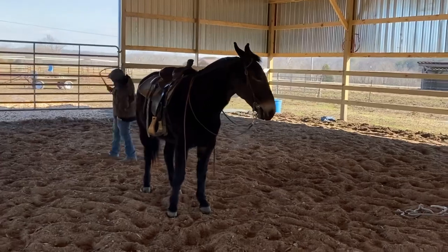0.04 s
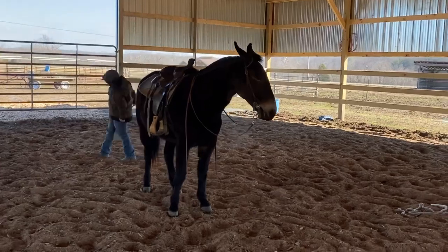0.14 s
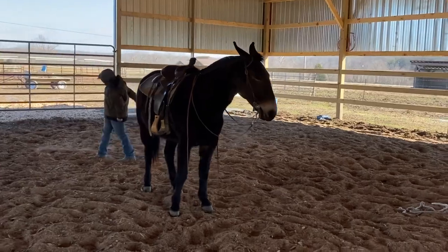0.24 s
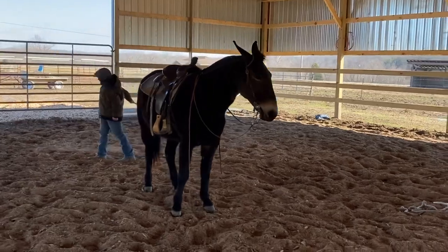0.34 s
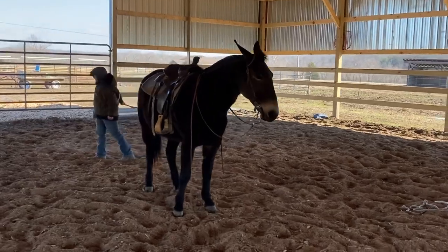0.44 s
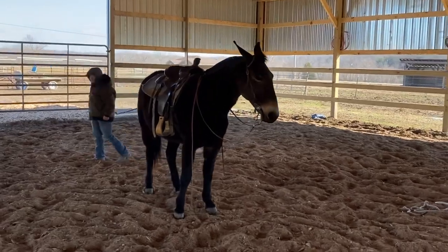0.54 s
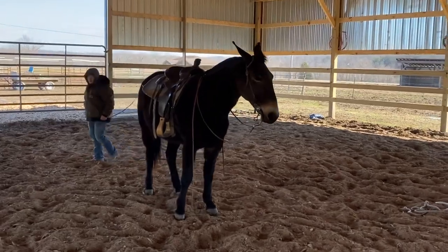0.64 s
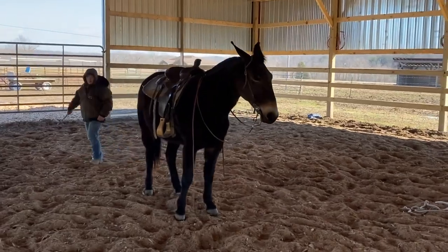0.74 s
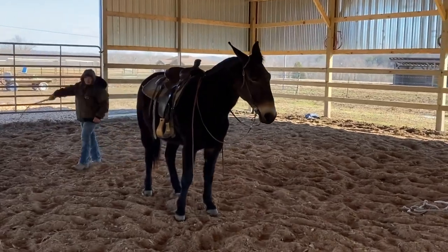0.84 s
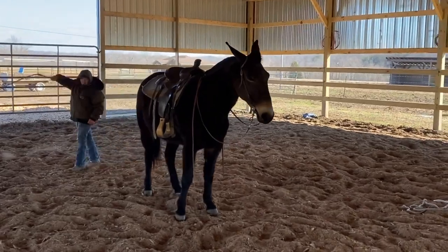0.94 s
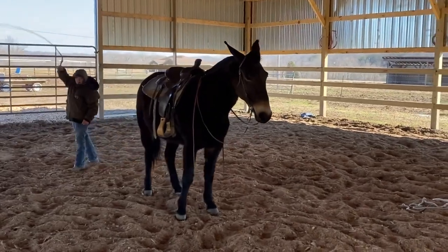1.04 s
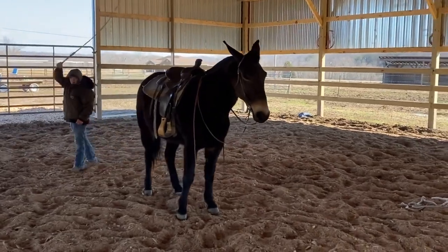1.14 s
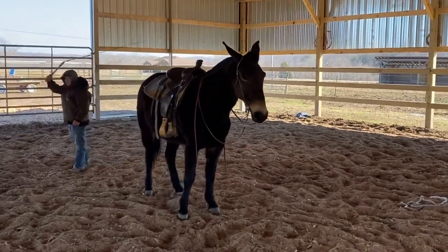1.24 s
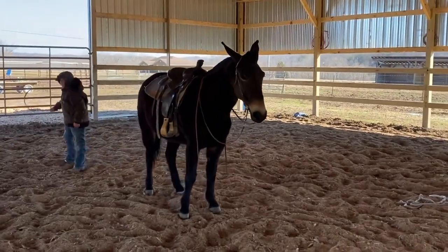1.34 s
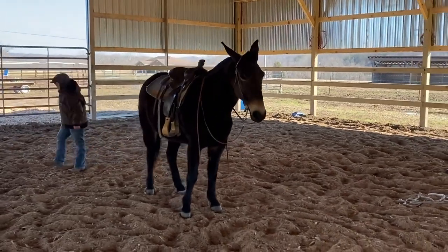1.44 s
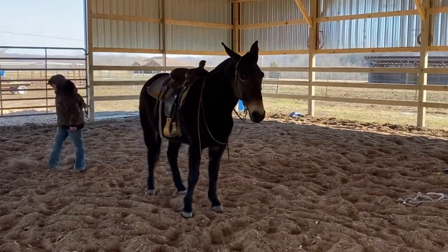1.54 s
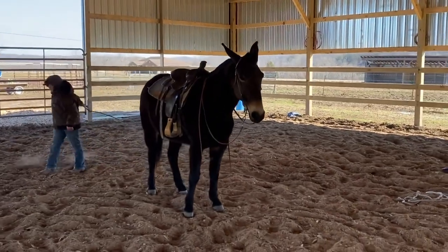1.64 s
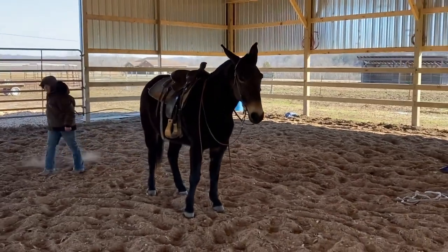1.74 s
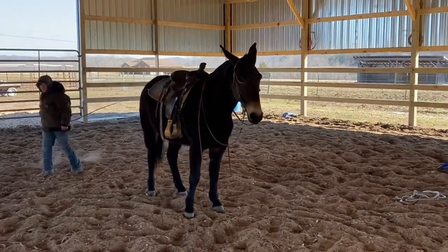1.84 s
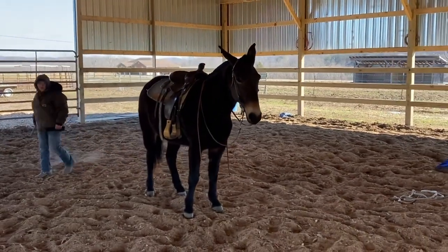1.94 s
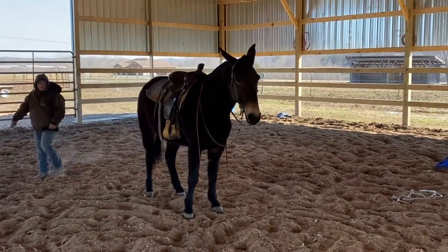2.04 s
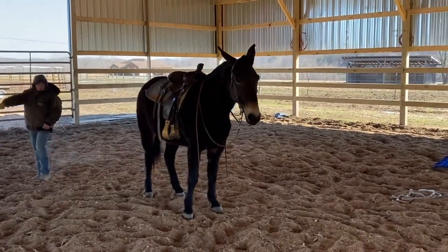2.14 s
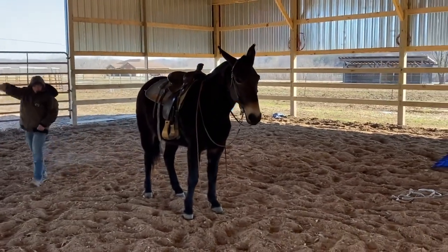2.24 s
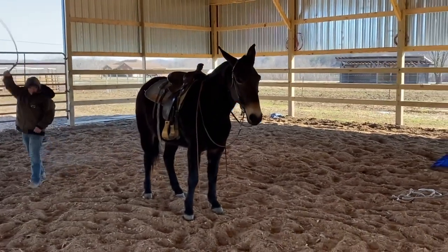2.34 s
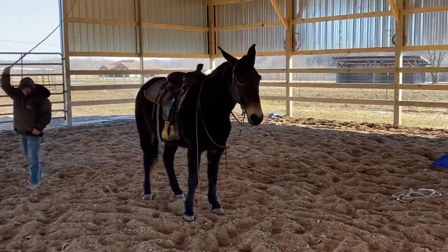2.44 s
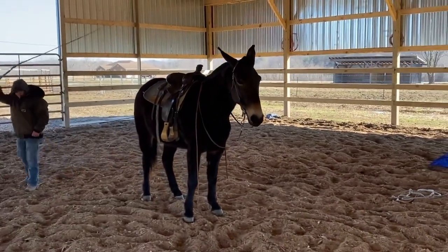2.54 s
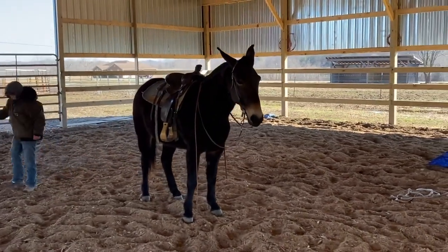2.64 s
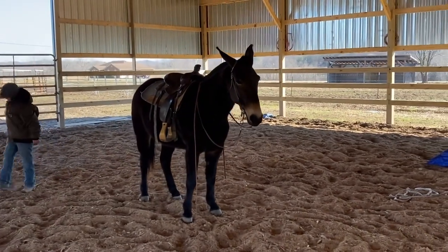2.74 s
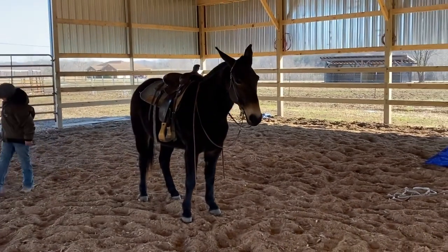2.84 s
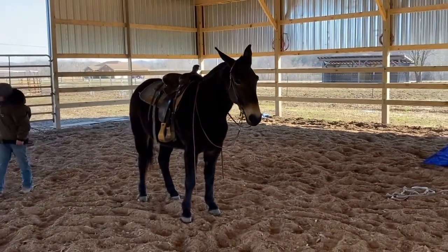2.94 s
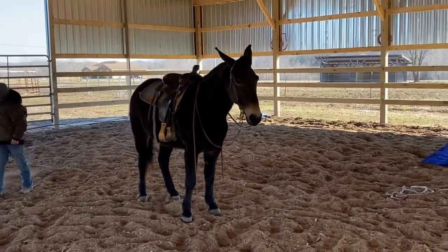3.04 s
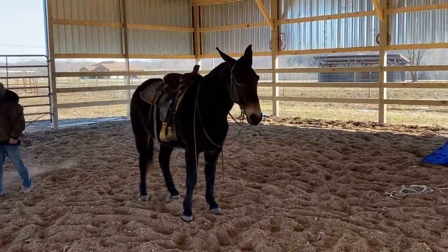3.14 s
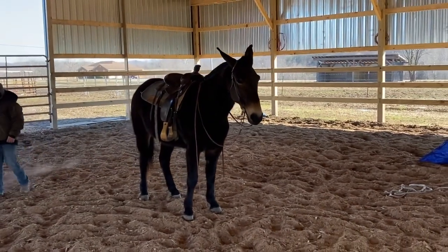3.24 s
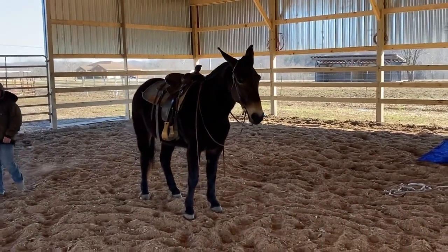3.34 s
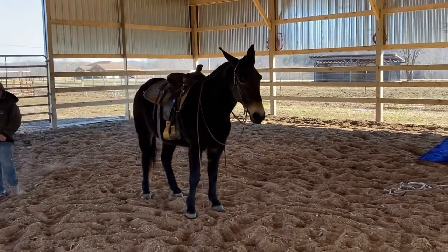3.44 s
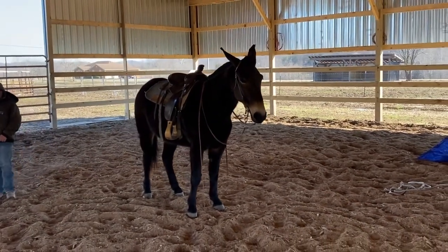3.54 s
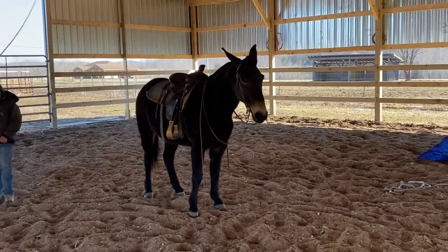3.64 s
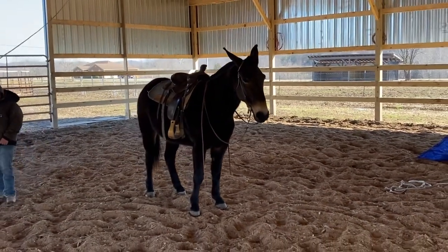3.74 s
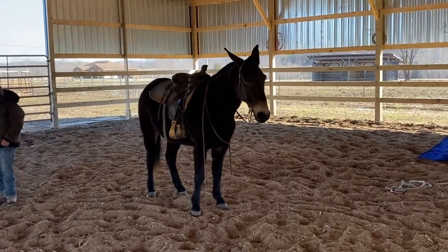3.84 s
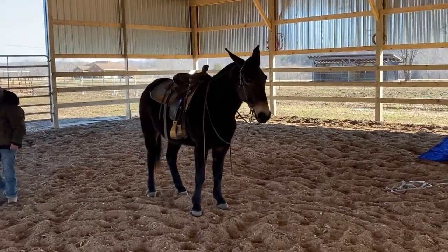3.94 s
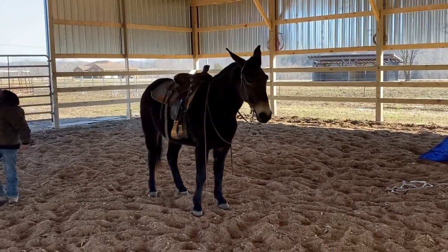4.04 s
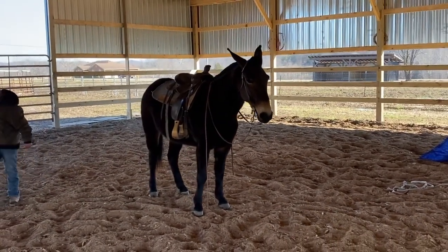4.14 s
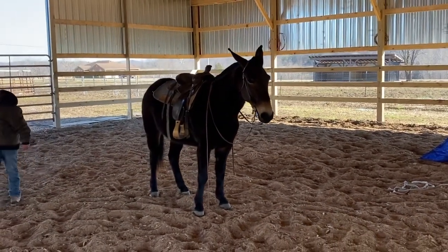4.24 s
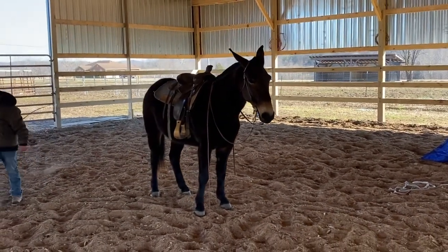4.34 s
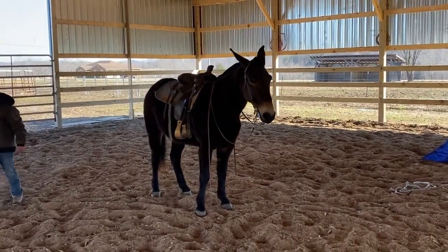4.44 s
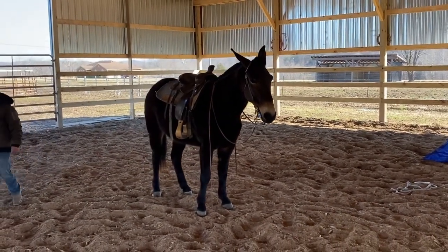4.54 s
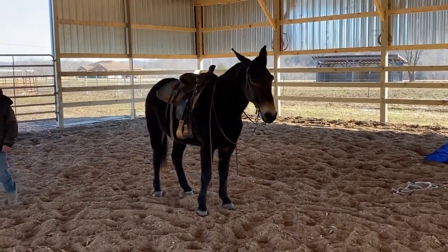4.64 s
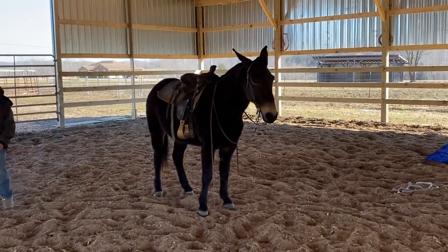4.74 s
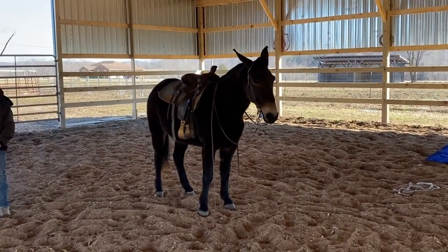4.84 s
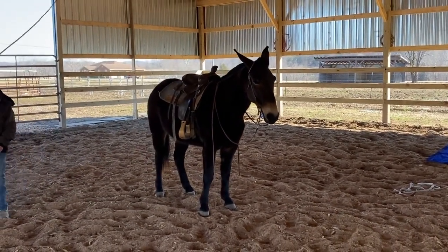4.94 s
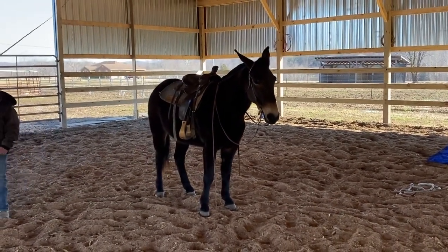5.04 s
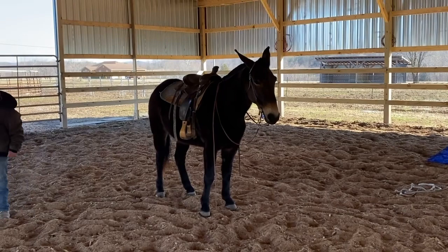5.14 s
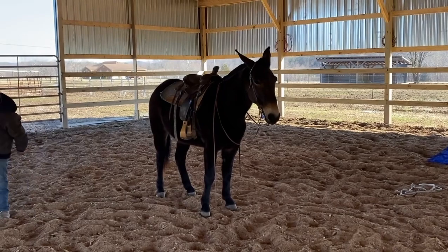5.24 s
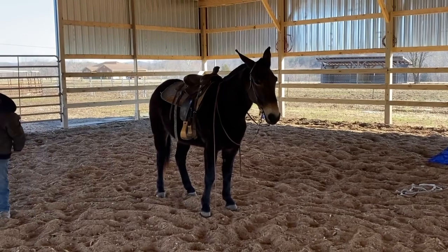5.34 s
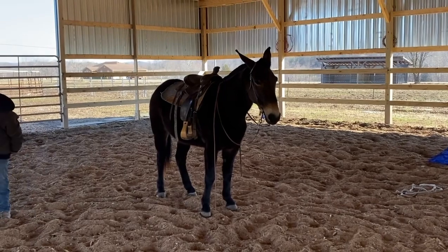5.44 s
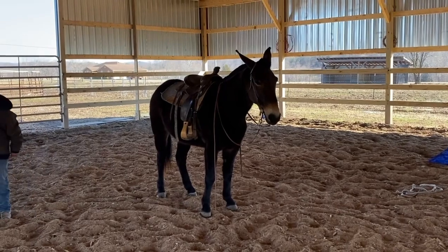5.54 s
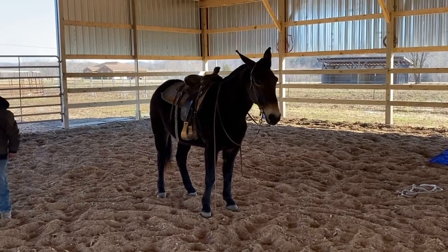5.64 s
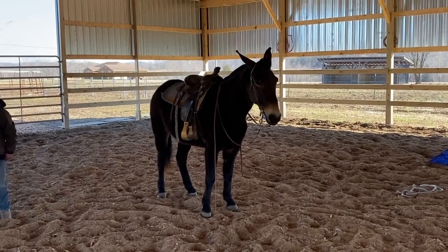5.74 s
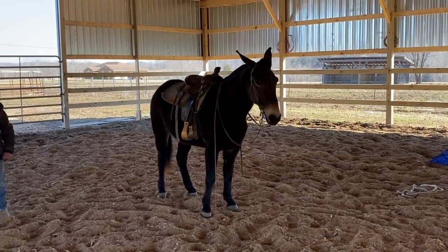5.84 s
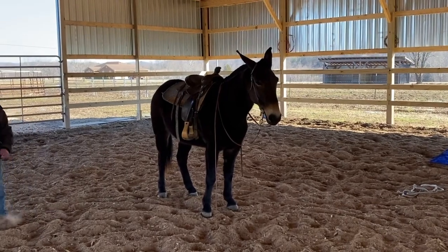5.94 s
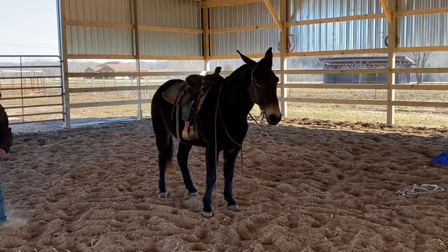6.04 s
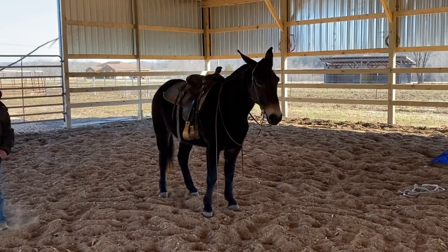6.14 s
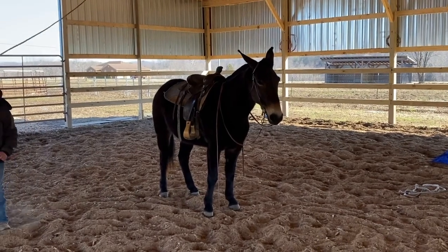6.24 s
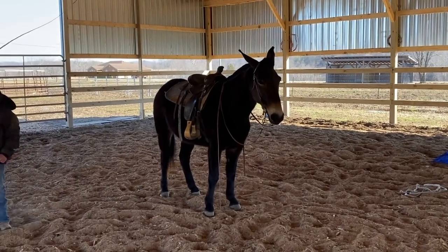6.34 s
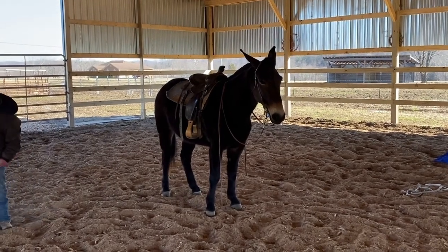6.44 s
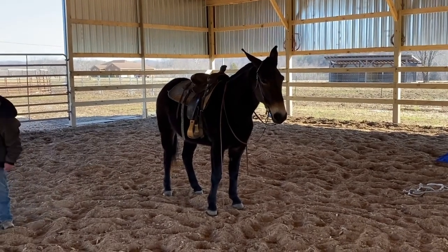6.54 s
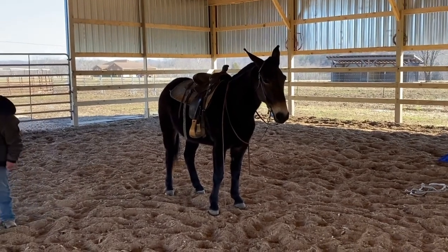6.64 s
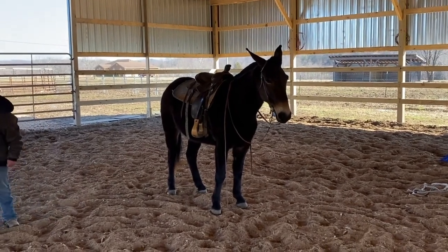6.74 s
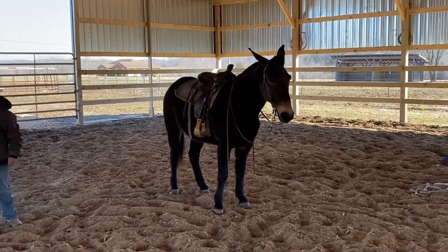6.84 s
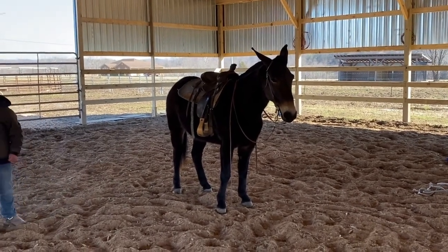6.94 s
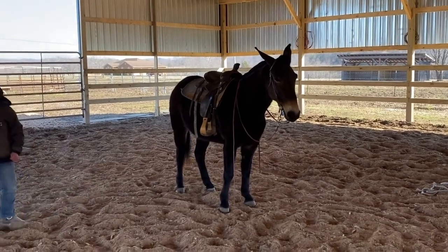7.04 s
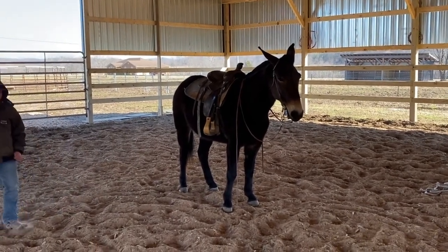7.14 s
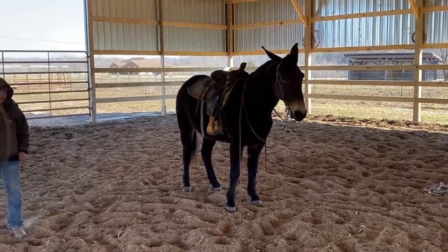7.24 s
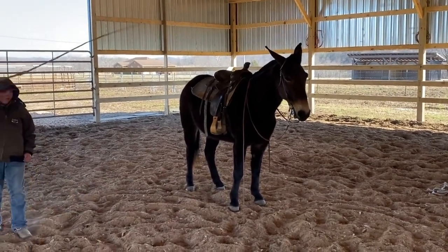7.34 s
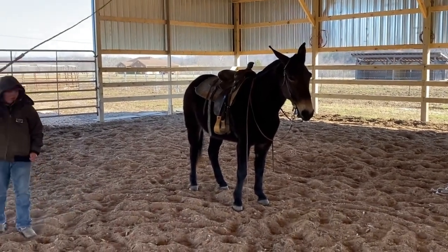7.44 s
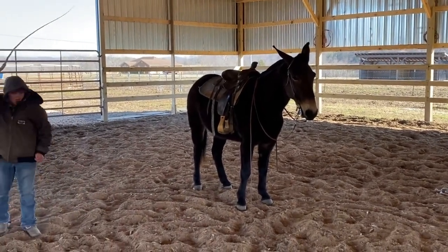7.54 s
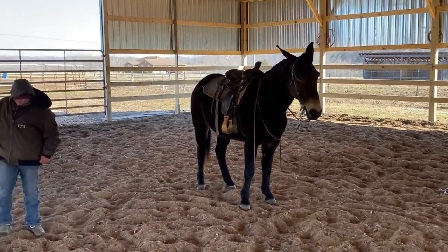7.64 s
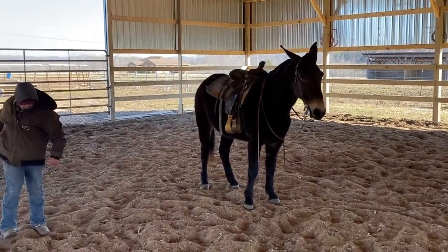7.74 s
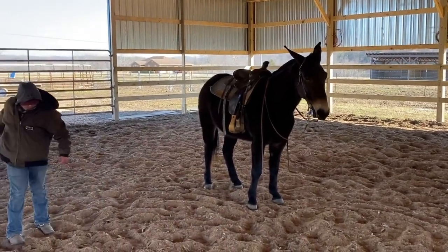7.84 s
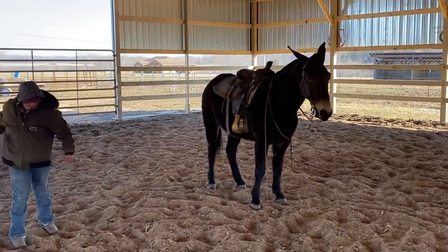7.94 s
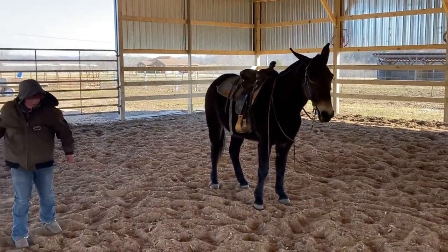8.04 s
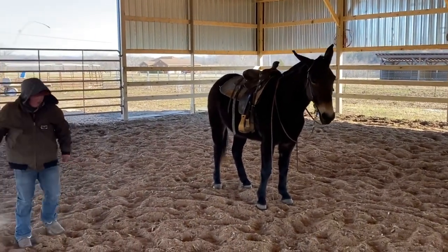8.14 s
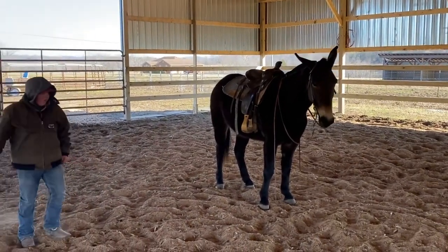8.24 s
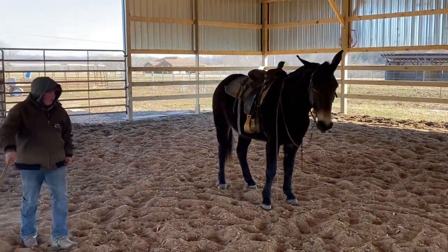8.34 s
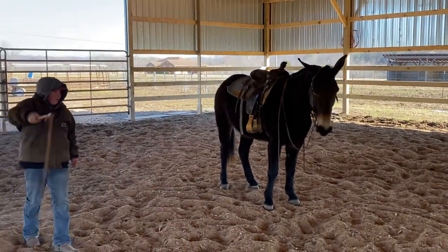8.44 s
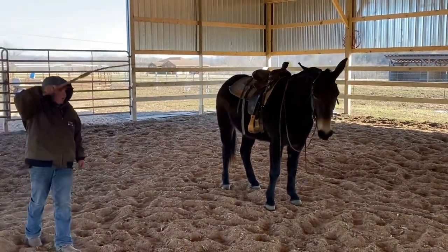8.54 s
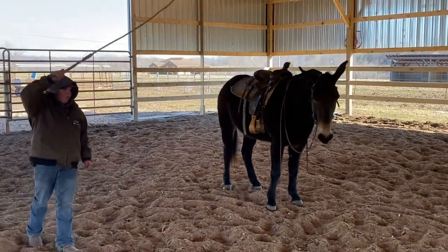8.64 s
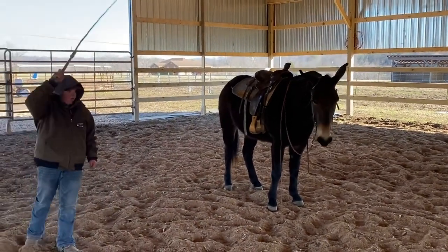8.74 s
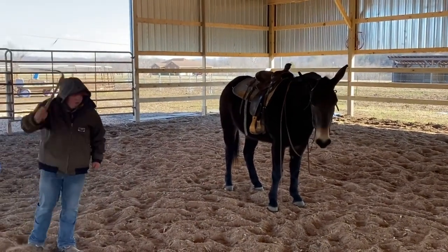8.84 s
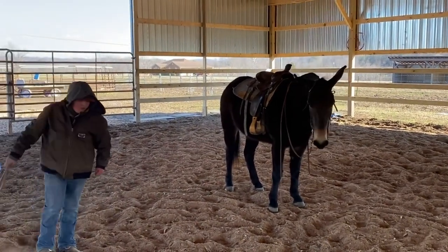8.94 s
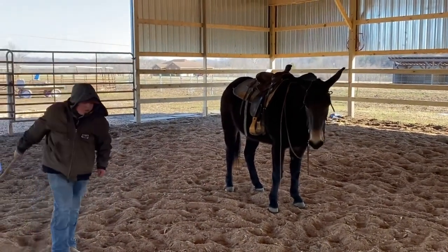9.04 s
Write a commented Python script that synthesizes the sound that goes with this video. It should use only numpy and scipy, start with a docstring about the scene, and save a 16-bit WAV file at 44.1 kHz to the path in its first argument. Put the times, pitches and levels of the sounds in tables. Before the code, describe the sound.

Eight sharp whip cracks ring under a metal arena roof, with soft swishes and slaps of the lash on sand between them.

```python
"""A long training whip cracks eight times in a sand-floored riding arena with a sheet-metal roof.
Each stroke: the rod whooshes, the tip rushes up and snaps, a low thump sweeps down, roof and hall answer.
Between cracks the lash slaps the sand and swishes back, among dull thuds and a few faint peeps.
Two microphone ports pick it up; gain control ducks after every crack."""
import sys
import numpy as np
from scipy import signal
from scipy.fft import rfft, irfft, next_fast_len
from scipy.io import wavfile
from scipy.ndimage import uniform_filter1d, minimum_filter1d

SR = 44100
rng = np.random.default_rng(int(sys.argv[2]) if len(sys.argv) > 2 else 0)


def unload_audio(sound):
    """Save the sound as a 16-bit wav file, at the path given as the first command line argument."""
    columns = np.transpose(np.atleast_2d(sound))
    # keep every value between -1 and 1, then stretch to whole-number steps
    steps = np.round(np.clip(columns, -1, 1) * 32767)
    wavfile.write(sys.argv[1], SR, steps.astype(np.int16))


N = 401310
TIME_S = np.arange(N) / SR
EVENT_S = np.arange(int(1.1 * SR)) / SR


def from_db(db):
    """Level to amplitude."""
    return 10 ** (np.asarray(db) / 20)


def unit_rms(x):
    """Scale to rms 1."""
    return x / np.sqrt(np.mean(x ** 2) + 1e-20)


def at_hz(points, hz):
    """Table lookup on a log-frequency axis."""
    f, value = np.transpose(points)
    return np.interp(np.log(np.maximum(hz, 1)), np.log(f), value)


def add(out, s, sound):
    """Mix a sound in from time s."""
    start = max(round(s * SR), 0)
    out[:, start:start + sound.shape[-1]] += sound[..., :max(N - start, 0)]


def bell(t, sigma_s):
    """Gaussian envelope around t = 0."""
    return np.exp(-np.minimum((t / sigma_s) ** 2, 100) / 2)


def random_curve(x):
    """Straight lines between normal draws at whole x."""
    return np.interp(x, np.arange(512), rng.standard_normal(512))


# Diffuse sound at the two ports: f/Hz, coherence
PORT_COHERENCE = [(50, .92), (200, .87), (500, .62), (1000, .4), (1500, .55), (2500, .965), (4000, .985),
                  (16000, .95)]

def diffuse_noise(spectrum, size, ripple_db=0, ripple_hz=80):
    """Stereo noise from all sides, rms 1; interfering reflections ripple its spectrum."""
    hz = np.fft.rfftfreq(size, 1 / SR)
    mid, side = rfft(rng.standard_normal((2, size)))
    level_db = at_hz(spectrum, hz) + ripple_db * random_curve(hz / ripple_hz)
    coherence = np.clip(at_hz(PORT_COHERENCE, hz), 0, 1)
    ports = np.sqrt(1 + coherence) * mid + np.sqrt(1 - coherence) * side * [[1], [-1]]
    return unit_rms(irfft(ports * from_db(level_db), size))


def click(spectrum, size=2048):
    """Minimum-phase pulse with this spectrum, peak 1."""
    hz = np.fft.rfftfreq(size, 1 / SR)
    cepstrum = irfft(np.log(from_db(at_hz(spectrum, hz))))
    causal = 2 * cepstrum * (np.arange(size) < size // 2)
    pulse = irfft(np.exp(rfft(causal) - cepstrum[0]))
    return pulse / np.abs(pulse).max()


def scatter(spectrum, decay_s, grain_db, build_s, size=16384):
    """Dying cluster of small, uneven arrivals."""
    t = np.arange(size) / SR
    grains = from_db(grain_db * unit_rms(uniform_filter1d(rng.standard_normal(size), size=24)))
    envelope = np.exp(-t / decay_s) * (1 - np.exp(-t / build_s))
    return diffuse_noise(spectrum, size, ripple_db=3) * unit_rms(grains) * envelope


# Background spectrum: f/Hz, level/dB
AMBIENCE = [(20, -3), (70, 11), (150, 3.5), (400, 1.5), (700, -1.5), (1100, -10), (3000, -17),
            (4700, -14.5), (7000, -16.5), (16000, -20)]

def ambience():
    """Steady quiet of the open-sided arena."""
    return from_db(-68.5) * diffuse_noise(AMBIENCE, N)


# Rod whoosh spectrum: f/Hz, level/dB
ROD_WHOOSH = [(100, -13), (220, -5), (400, -2.5), (680, -3.5), (900, -12.5), (1500, -19.5), (3000, -29),
              (8000, -41.5)]
# Moved-air spectrum: f/Hz, level/dB
AIR_RUMBLE = [(20, -24), (45, -3), (70, -0.5), (110, -7.5), (170, -15.5), (300, -30), (1000, -54.5)]
# Rod return strokes: t/s, sigma/s, whoosh/dB, relative rumble/dB
ROD_BACKSWINGS = [(1.05, .12, -56, -54.5), (2.268, 0.16, -59.5, -62.5), (3.484, .17, -57.5, -47.5),
                  (4.779, 0.15, -63.5, -62), (6.064, 0.12, -61, -56.5), (7.181, 0.12, -60, -54.5),
                  (8.49, 0.085, -56.5, -64)]

def rod_swings(lead_s=0.082, forward_sigma_s=0.062, wake_fade_s=0.24, lump_db=4, lumps_per_s=14):
    """The rod whooshes forward and back, fastest just before each crack, and stirs a lumpy rumble."""
    whoosh, rumble = 0, from_db(-71.5)  # air at rest
    for s, whoosh_db, *_ in WHIP_CRACKS:
        swing = from_db(whoosh_db) * bell(TIME_S - s + lead_s, forward_sigma_s)
        wake = from_db(-53.5) * (TIME_S > s) * np.exp(-np.abs(TIME_S - s) / wake_fade_s)
        whoosh += swing
        rumble += from_db(-3.5) * swing + wake
    for s, sigma_s, whoosh_db, rumble_db in ROD_BACKSWINGS:
        swing = bell(TIME_S - s, sigma_s)
        whoosh += from_db(whoosh_db) * swing
        rumble += from_db(rumble_db - 4.5) * swing
    rumble *= from_db(lump_db * random_curve(TIME_S * lumps_per_s))
    return whoosh * diffuse_noise(ROD_WHOOSH, N) + rumble * diffuse_noise(AIR_RUMBLE, N)


# Tip air-noise spectrum: f/Hz, level/dB
TIP_RUSH = [(60, -8.5), (300, -4), (550, 0), (900, -1), (1400, 1), (2400, -2), (4000, -11.5), (6000, -19),
            (16000, -30.5)]

def tip_rush(peak_s, swell_s=0.0021, early_db=-23, early_s=0.009, fade_s=0.0039):
    """Air noise of the tip, swelling as the loop runs out."""
    before, after = np.maximum(peak_s - EVENT_S, 0), np.maximum(EVENT_S - peak_s, 0)
    swell = np.exp(-before / swell_s) + from_db(early_db) * np.exp(-before / early_s)
    return diffuse_noise(TIP_RUSH, len(EVENT_S)) * swell * np.exp(-after / fade_s)


# Shock wave spectrum: f/Hz, level/dB
SHOCK = [(150, -19), (600, -8.5), (1200, -2.5), (2200, 0.5), (3300, -4), (4700, -0.5), (6500, -12.5),
         (10000, -10.5), (16000, -15.5)]
# Roof and far-wall echo spectrum: f/Hz, level/dB
ROOF_ECHO = [(60, -13.5), (250, -5.5), (550, -7.5), (900, -5.5), (1450, 2.5), (2300, -1.5), (3300, -3.5),
             (4800, -8), (6500, -15), (11000, -18.5), (16000, -24)]
# Duller end-wall echo spectrum: f/Hz, level/dB
END_ECHO = [(100, -7), (400, -0.5), (900, 1.5), (1600, 2), (3500, -3), (6500, -16.5), (16000, -22.5)]
# Snap reverb spectrum: f/Hz, level/dB
SNAP_REVERB = [(40, -10.5), (150, -10), (400, -9.5), (900, -2), (1450, 2), (2300, 0), (3300, -1),
               (4800, -6), (6500, -11), (11000, -13.5), (16000, -15.5)]
# Thump reverb spectrum: f/Hz, level/dB
THUMP_REVERB = [(25, -12.5), (48, 3.5), (75, -6), (130, -16.5), (300, -16), (700, -19), (2000, -55)]
# Strokes, levels relative per column: t/s, whoosh/dB, rush/dB, snap/dB, thump/dB, side wall/dB,
# roof delay/s, roof/dB, roof decay/s, hall/dB
WHIP_CRACKS = [(0.1572, -52, -20.5, 0, -9.5, 2, .0136, -5.5, 0.06, -17),
               (1.412, -60, -16.5, 1, -8.5, 2, .014, -6.5, 0.036, -17),
               (2.7420, -59, -16.5, 1, 1.5, -20.5, .013, -9.5, 0.017, -17),
               (3.9730, -58, -14.5, 1.5, 1, -17, .014, -10.5, .024, -20),
               (5.2520, -63, -8.5, -4, -2, -15.5, .015, -15.5, 0.009, -20.5),
               (6.511, -64, -13.5, 0.5, 2, -12, .0153, -10, .03, -22.5),
               (7.7153, -65.5, -12, 1, -6, -14, .015, -13, 0.024, -23),
               (8.9746, -64, -5.5, -4.5, -9, -15, .0186, -18.5, .02, -24)]

def cracks(rush_lead_s=0.1, far_wall_s=0.088, end_wall_s=0.21):
    """The tip's shock wave arrives direct, then off side wall, ribbed roof, far walls and whole hall."""
    out, shock = np.zeros((2, N)), click(SHOCK)
    for s, _, rush_db, snap_db, thump_db, side_db, roof_s, roof_db, roof_decay_s, hall_db in WHIP_CRACKS:
        add(out, s - rush_lead_s, from_db(rush_db) * tip_rush(rush_lead_s))
        add(out, s, from_db(snap_db + 1.5) * shock)
        burst = scatter(SHOCK, decay_s=0.00062, grain_db=1.5, build_s=0.0001)
        add(out, s - 0.0005, from_db(snap_db - 1) * burst)
        thump_decay_s = 0.011 * 2 ** (thump_db / 9)  # stronger lasts longer
        pulse = thump(thump_decay_s, drop_hz=490, end_hz=60.4, sweep_s=0.0038, rise_s=0.0008)
        add(out, s, from_db(thump_db) * pulse)

        add(out, s + 0.005, from_db(side_db + 0.5) * shock)
        side_wall = scatter(SHOCK, decay_s=0.0096, grain_db=1.5, build_s=0.00025)
        add(out, s + 0.0061, from_db(side_db - 7.5) * side_wall)
        add(out, s + roof_s, from_db(roof_db + 12.5) * shock)
        panels = scatter(ROOF_ECHO, decay_s=0.0082, grain_db=3.5, build_s=0.00018)
        rafters = scatter(ROOF_ECHO, roof_decay_s, grain_db=1.5, build_s=0.0007)
        add(out, s + roof_s, from_db(roof_db - 1.5) * (panels + rafters))
        far_wall = scatter(ROOF_ECHO, decay_s=0.042, grain_db=2.5, build_s=0.011)
        add(out, s + far_wall_s, from_db(1.9 * roof_db - 4.5) * far_wall)
        end_wall = scatter(END_ECHO, decay_s=0.0464, grain_db=0.5, build_s=0.0079)
        add(out, s + end_wall_s, from_db(hall_db - 14.5) * end_wall)

        add(out, s + roof_s, from_db(hall_db) * reverb(SNAP_REVERB, build_s=0.013))
        add(out, s + roof_s, from_db(thump_db - 40) * reverb(THUMP_REVERB, build_s=0.04))
        add(out, s, from_db(2.4 * thump_db - 39.5) * boom())
    return out


def thump(decay_s, drop_hz, end_hz, sweep_s, rise_s):
    """Low pulse of a few cycles, falling fast in pitch."""
    hz = end_hz + drop_hz * np.exp(-EVENT_S / sweep_s)
    envelope = (1 - np.exp(-EVENT_S / rise_s)) * np.exp(-EVENT_S / decay_s)
    return np.sin(2 * np.pi * np.cumsum(hz) / SR) * envelope


# Arena decay: f/Hz, T60/s
REVERB_T60 = [(50, 0.73), (200, .8), (500, 0.87), (1500, 0.74), (3000, 0.74), (5000, 0.66), (9000, 0.6),
              (16000, 0.24)]

def reverb(spectrum, build_s):
    """Arena reverberation builds up, then each band dies at its own rate."""
    size = len(EVENT_S)
    noise = rfft(diffuse_noise(spectrum, size, ripple_db=2))
    hz = np.fft.rfftfreq(size, 1 / SR)
    centres_hz, t60s = np.transpose(REVERB_T60)
    out = 0
    for weights, t60_s in zip(np.eye(len(centres_hz)), t60s):
        band = at_hz(np.column_stack([centres_hz, weights]), hz)
        out += irfft(noise * band, size) * from_db(-60 * EVENT_S / t60_s)
    return out * (1 - np.exp(-EVENT_S / build_s))


def boom(hz=48.6, peak_s=0.16, half_width_s=0.11):
    """Deep hum that swells and fades after a thump."""
    return np.sin(2 * np.pi * hz * EVENT_S) * np.exp(-((EVENT_S - peak_s) / half_width_s) ** 4)


# Soft knocks: t/s, level/dB
LOW_THUDS = [(0.517, -39.5), (3.059, -28), (3.391, -37), (3.495, -44), (4.653, -42.5), (4.764, -35),
             (5.952, -37), (6.151, -42.5), (6.871, -34.5), (7.022, -39.5)]

def thuds():
    """Dull low knocks between strokes."""
    out = np.zeros((2, N))
    knock = thump(decay_s=0.023, drop_hz=388, end_hz=58.5, sweep_s=0.00704, rise_s=0.01)
    for s, db in LOW_THUDS:
        add(out, s, from_db(db) * knock)
    return out


# Lash-on-sand spectrum, also colours the swish reverb: f/Hz, level/dB
SAND = [(100, 0), (400, 2.2), (1200, 1.3), (2200, 1.2), (4000, -1.9), (7000, -2.2), (12500, 0.95),
        (16000, -0.5)]
# Lash landings and light touches: t/s, relative level/dB
LASH_SLAPS = [(0.8395, -28.5), (2.1134, -24.5), (3.39, -28), (3.496, -41.5), (3.626, -43.5), (4.6414, -29),
              (4.765, -39.5), (5.146, -46), (5.9454, -30), (7.1205, -34), (8.3668, -36.5)]

def slaps():
    """The lash hits the sand in quick ticks and throws grains; roof and hall return the bright sound."""
    out, tick = np.zeros((2, N)), click(SAND)
    for s, db in LASH_SLAPS:
        add(out, s, from_db(db + 2.5) * tick)
        impact = scatter(SAND, decay_s=0.0057, grain_db=2.5, build_s=0.00073)
        add(out, s - 0.002, from_db(db - 10) * impact)
        spray = scatter(SAND, decay_s=0.022, grain_db=1, build_s=0.001)
        add(out, s + 0.011, from_db(db - 18) * spray)
        add(out, s + 0.03, from_db(db - 25) * reverb(SAND, build_s=0.0021))
    return out


# Lash drawn back: t/s, sigma/s, f/Hz, glide/(octaves/s), half bandwidth/share of f, level/dB
LASH_SWISHES = [(0.98, .045, 1050, 5.5, .18, -56.5), (1.16, .02, 2300, -.5, .04, -67),
                (2.25, 0.019, 1300, 7.5, 0.24, -57), (3.516, 0.019, 1403, 5.5, 0.17, -54),
                (4.794, 0.031, 1146, -8.5, .25, -56.5), (6.08, .041, 1088, 3, 0.18, -58.5),
                (7.248, .01, 1580, 46, 0.35, -55), (7.281, 0.0068, 3130, -2.5, 0.057, -58.5),
                (8.46, 0.012, 400, 19.5, 0.19, -56), (8.497, .016, 1013, 17, 0.15, -46.5),
                (8.584, 0.026, 2290, -3.5, 0.051, -66)]

def swishes(wet_db=-11, lead_s=0.25):
    """Vortices shed by the lash make a breathy tone whose pitch follows its speed."""
    out, t = np.zeros((2, N)), EVENT_S - lead_s
    for s, sigma_s, hz, octaves_per_s, width_share, db in LASH_SWISHES:
        pitch_hz = hz * 2 ** (octaves_per_s * np.clip(t, -2 * sigma_s, 2 * sigma_s))
        phase = 2 * np.pi * np.cumsum(pitch_hz) / SR
        lowpass = signal.butter(2, hz * width_share, fs=SR, output="sos")
        in_phase, quadrature = signal.sosfilt(lowpass, rng.standard_normal((2, len(t))))
        narrow_noise = unit_rms(in_phase * np.cos(phase) + quadrature * np.sin(phase))
        tone = from_db(db) * narrow_noise * bell(t, sigma_s)
        room = unit_rms(reverb(SAND, build_s=0.024)) / np.sqrt(len(t))
        add(out, s - lead_s, tone)
        add(out, s - lead_s, from_db(wet_db) * signal.fftconvolve(tone[None], room, axes=1))
    return out


# Faint high whistles: t/s, f/Hz, level/dB
HIGH_PEEPS = [(1.064, 5700, -66), (1.2, 5400, -65), (1.213, 4750, -63), (1.357, 4940, -57),
              (1.38, 4700, -61)]

def peeps(sigma_s=0.0038, waver_share=0.046, lead_s=0.05):
    """Very short wavering whistles, perhaps a small bird or the tack."""
    out, t = np.zeros((2, N)), EVENT_S - lead_s
    for s, hz, db in HIGH_PEEPS:
        waver = unit_rms(uniform_filter1d(rng.standard_normal(len(t)), size=64))
        phase = 2 * np.pi * np.cumsum(hz * (1 + waver_share * waver)) / SR
        add(out, s - lead_s, from_db(db) * np.sin(phase) * bell(t, sigma_s))
    return out


# Port level difference: f/Hz, left minus right/dB
PORT_BALANCE_DB = [(50, 0), (250, -0.8), (500, 1), (800, 4), (1350, -7), (2000, 0.2), (4000, -1.5),
                   (16000, 0.5)]
# Port phase difference: f/Hz, left lead/rad
PORT_LEAD_RAD = [(0, 0), (130, .4), (450, .54), (800, 1.25), (1000, 2.2), (1400, 2.9), (1950, 6.2),
                 (7500, 6.2), (8700, 3.3), (9500, 3), (10400, .3), (11800, -.2), (12800, -3), (13600, -3.3),
                 (14600, -6.2)]

def scene():
    """All sources at two ports whose level and phase differ with frequency."""
    mix = cracks() + slaps() + swishes() + thuds() + peeps() + rod_swings() + ambience()
    size = next_fast_len(N + SR)
    left, right = rfft(mix, size)
    hz = np.fft.rfftfreq(size, 1 / SR)
    lead_rad = np.interp(hz, *np.transpose(PORT_LEAD_RAD))
    lean = from_db(at_hz(PORT_BALANCE_DB, hz) / 2) * np.exp(1j * lead_rad / 2)  # half per port
    return irfft([left * lean, right / lean], size)[:, :N]


def gain_control(x, threshold_db, depth_db, hold_s, release_db_per_s, attack_s):
    """Loud sound turns the gain down; it holds briefly, then recovers."""
    power = uniform_filter1d(np.mean(x ** 2, axis=0), size=220)
    level_db = 10 * np.log10(np.abs(power) + 1e-12)
    cut_db = np.clip(level_db - threshold_db, 0, depth_db)
    half_hold = int(hold_s * SR / 2)
    held_db = -minimum_filter1d(-cut_db, 2 * half_hold + 1, origin=half_hold, mode="constant")
    ramp_db = release_db_per_s * TIME_S
    released_db = np.maximum.accumulate(held_db + ramp_db) - ramp_db
    pole = np.exp(-1 / (attack_s * SR))
    return x * from_db(-signal.lfilter([1 - pole], [1, -pole], released_db))


def record(dry):
    """Gain control, soft clipping, steep low-pass."""
    ceiling, cutoff_hz = 1.05, 15950
    ducked = gain_control(dry, threshold_db=-28, depth_db=5.5, hold_s=0.07,
                          release_db_per_s=134, attack_s=0.0065)
    lowpass = signal.ellip(10, 0.1, 80, cutoff_hz, fs=SR, output="sos")
    return signal.sosfilt(lowpass, ceiling * np.tanh(ducked / ceiling))


dry = scene()
out = record(dry)
unload_audio(out)
```